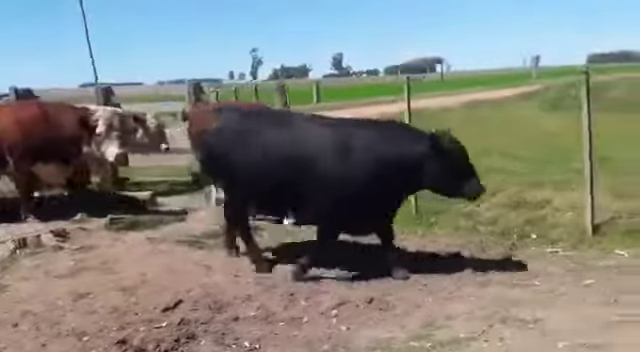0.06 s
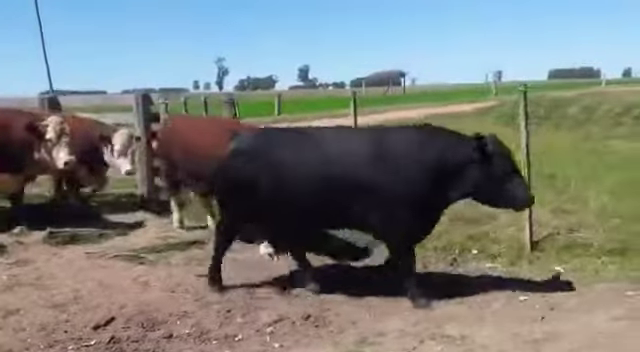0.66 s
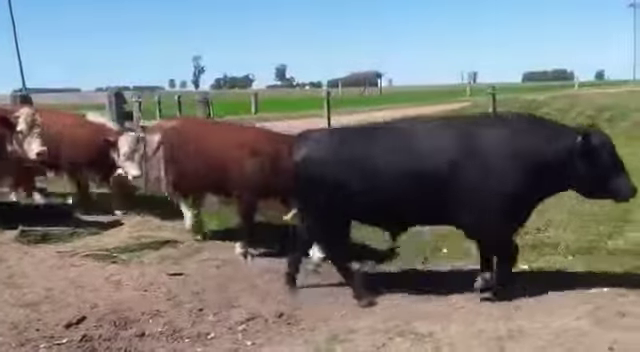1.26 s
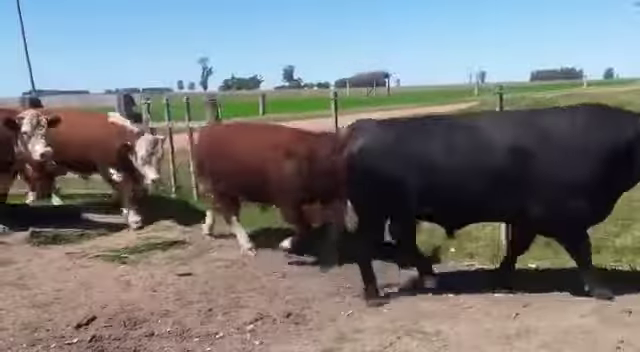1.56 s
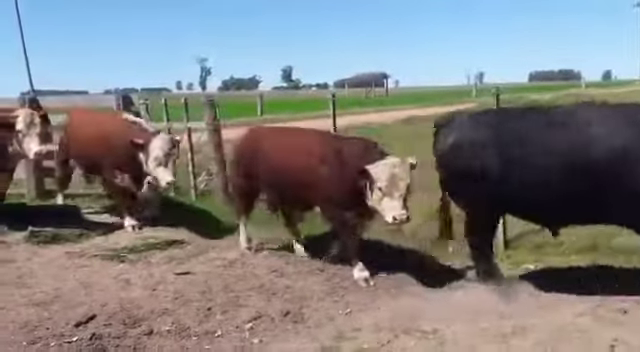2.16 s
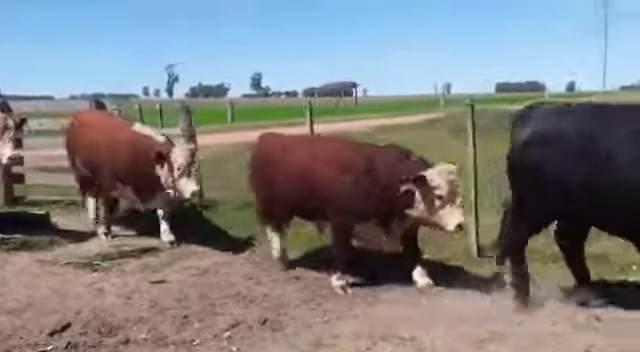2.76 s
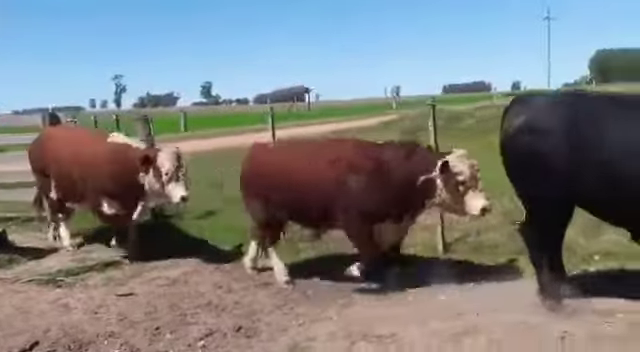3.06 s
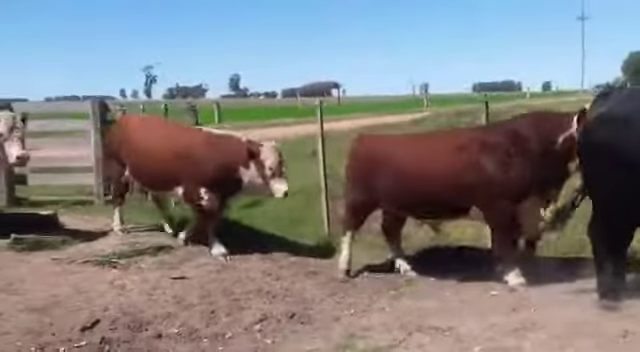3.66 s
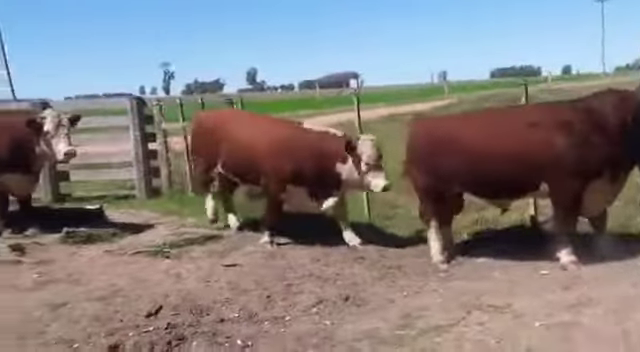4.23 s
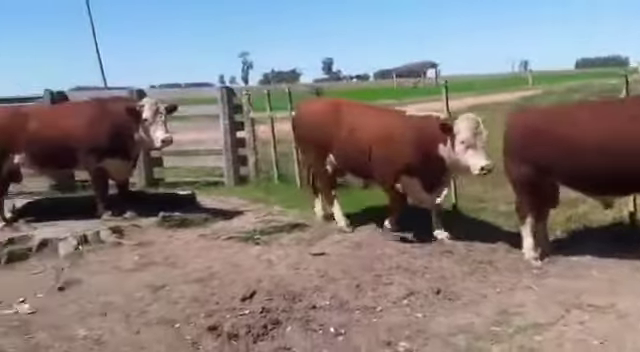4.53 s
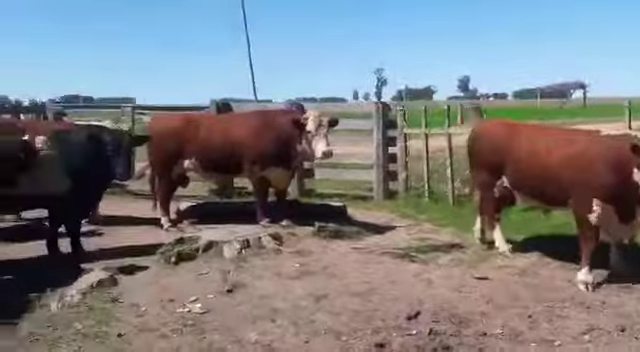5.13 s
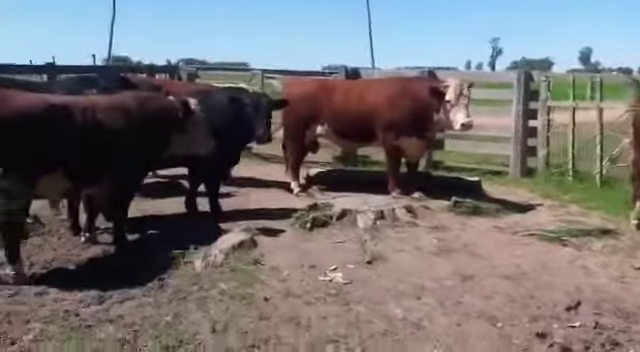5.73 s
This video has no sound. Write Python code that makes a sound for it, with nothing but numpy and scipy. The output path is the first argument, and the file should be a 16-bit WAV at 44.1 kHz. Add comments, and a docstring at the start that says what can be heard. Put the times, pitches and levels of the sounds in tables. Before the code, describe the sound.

Cattle walk over dry ground with soft hoof knocks, then a bull growls and lets out short, high, echoing bellows.

```python
"""A bull bellows while the herd walks across a dry dirt pen in open country.
Each bellow starts as a rough growl, from slack vocal folds slapping together, and breaks into a
high trumpeting note, from tight folds, that echoes off sheds and fences. Hooves knock on the ground,
flick pebbles and scuff up sand. Small birds whistle far off and a light breeze blows."""
import sys
import numpy as np
from scipy import signal
from scipy.fft import rfft, irfft, next_fast_len
from scipy.io import wavfile
from scipy.ndimage import uniform_filter1d, map_coordinates

SR = 44100
rng = np.random.default_rng(int(sys.argv[2]) if len(sys.argv) > 2 else 0)


def log_audio(samples):
    """Write samples as a 16-bit WAV file to the path given in sys.argv[1]."""
    # one column per channel
    frames = np.atleast_2d(samples).T
    # limit to full scale, then quantise
    limited = np.clip(frames, -1, 1)
    pcm = np.round(limited * 32767).astype(np.int16)
    wavfile.write(sys.argv[1], SR, pcm)


N = 259749
TIME = np.arange(N) / SR


def growl(slack_hz=98, tense_hz=108, jitter=.06, throat_lift=1.106):
    """Slack vocal folds slap unevenly and ring the airway; effort makes them faster and steadier."""
    # where the relaxed throat rings: f/Hz, width/Hz, gain/dB
    throat_modes = [(356, 110, -27.5), (408, 160, 10.5), (578, 42, 3.5)]
    # where the open mouth rings: f/Hz, width/Hz, gain/dB
    mouth_modes = [(897, 100, 17), (1130, 120, 8.5), (1680, 720, -28), (3170, 670, -15)]
    throat_gain, chest_gain, mouth_gain = growl_gains() * from_db([[-1.5], [-2.5], [-0.7]])
    effort = np.clip(throat_gain / from_db(-30), 0, 1)
    looseness = 1 - .5 * effort
    pitch = (slack_hz + (tense_hz - slack_hz) * effort) * (1 + jitter * looseness * drift(90))
    cycles = np.cumsum(pitch) / SR
    slaps = rms_one(np.diff(np.floor(cycles), prepend=0))
    # air rushes through once a cycle, while the folds are apart
    puffs = rms_one(rng.standard_normal(N) * np.exp(-(cycles % 1)))
    source = slaps + 1.2 * looseness * puffs
    chest = band(source, 131, 256.6, order=4)
    tense_modes = [(hz * throat_lift, width, db) for hz, width, db in throat_modes]
    throat = (1 - effort) * airway(source, throat_modes) + effort * airway(source, tense_modes)
    mouth = airway(source + puffs, mouth_modes)
    return chest_gain * even_out(chest) + throat_gain * even_out(throat) + mouth_gain * even_out(mouth)


def growl_gains(swell_db=15.5, rounding_s=.02, chest_share=0.54, stop_db_per_s=444.5):
    """Throat, chest and mouth swell and fade together with each push of air."""
    # pushes of air: peak t/s, rise/s, fall/s, then levels before trim: throat/dB, chest/dB, mouth/dB
    pushes = [(2.33, 0.15, .06, -45, -50, -63), (2.473, 0.097, .12, -30, -40.5, -62.5),
              (2.698, .1, .15, -29, -44, -49.5), (2.839, 0.07, 0.064, -41, -41, -55),
              (3.158, 0.031, .26, -40, -51, -55.5), (3.39, 0.23, 0.24, -50, -48, -67),
              (3.689, 0.032, .06, -38, -42, -74), (3.94, 0.15, .07, -27.5, -43, -43),
              (4.272, 0.21, 0.11, -50.5, -50.5, -68), (4.647, 0.041, .17, -33, -45.5, -60),
              (4.92, 0.092, 0.15, -45.5, -45.5, -53.5), (5.136, 0.052, 0.13, -27, -38, -44.5)]
    gains = np.zeros((3, N))
    for s, rise_s, fall_s, throat_db, chest_db, mouth_db in pushes:
        span_s = np.where(TIME < s, rise_s, fall_s)
        drop_db = swell_db * (np.hypot(TIME - s, rounding_s) - rounding_s) / span_s
        # outside the push the folds are quickly still
        stop_db = stop_db_per_s * np.clip(np.abs(TIME - s) - span_s, 0, .5)
        levels_db = np.array([throat_db - drop_db, chest_db - chest_share * drop_db, mouth_db - drop_db])
        gains += from_db(levels_db - stop_db)
    return gains


def airway(source, modes):
    """The air in the throat or mouth rings at several pitches at once."""
    return sum(from_db(db) * resonate(resonate(source, hz, width), hz, width) for hz, width, db in modes)


def trumpet(note, jitter=0.036, flutter=0.84, rasp=0.59, closed_db=-15, wide_open_hz=600):
    """Tight folds sing one high arching note, which a slower flutter tears up as it falls."""
    # overtone strength with the mouth wide open: f/Hz, gain/dB
    overtones = [(700, -13), (870, -18), (1100, -2), (1300, -11), (1480, -8), (1690, -6), (1900, -24),
                 (2250, -18.5), (2600, -37), (3150, -29), (3800, -49), (6000, -70)]
    pitch, level_db, overtones_db, rough = note_shape(*note)
    on = level_db > -70
    count = on.sum()
    phase = 2 * np.pi * np.cumsum(pitch * (1 + jitter * (rough + 0.096) * drift(350))) / SR
    slow_folds = np.sin(2 * np.pi * np.cumsum(100 * (1 + 0.1692 * drift(70))) / SR)
    # the mouth opens as the pitch climbs and lets out the high overtones
    opening = from_db(closed_db * np.clip((wide_open_hz - pitch) / 190, 0, 1))
    tone = np.zeros(N)
    for k in range(1, 9):
        # uneven closing of the folds turns part of each tone hoarse, the higher the more
        hoarse = np.clip(.2 * (k - 1) + .7 * rough[on], 0, .92)
        scatter = (wobble(220, count) + 1j * wobble(220, count)) / np.sqrt(2)
        waver = np.sqrt(1 - hoarse ** 2) + hoarse * scatter
        gain = from_db(overtones_db[on] + at_hz(overtones, k * pitch[on])) if k > 1 else 1.0
        tone[on] += gain * (opening[on] if k > 2 else 1) * np.imag(waver * np.exp(1j * k * phase[on]))
    # rushing air is bright through an open mouth and hollow through a nearly closed one
    bright = rms_one(colour(band(rng.standard_normal(N), 680, 7000, order=3), overtones))
    hollow = rms_one(band(rng.standard_normal(N), 733, 1100))
    hiss = (opening * bright + 0.88 * (1 - 0.74 * opening) * hollow) * (1 + 0.094 * np.sin(phase))
    rumble = rms_one(band(rng.standard_normal(N), 220, 850, order=4))
    breath = rasp * (rough + 0.39) * from_db(overtones_db) * hiss + 0.067 * (rough + 0.2) * rumble
    voice = np.sqrt(2) * tone * (1 + flutter * rough * slow_folds)
    return from_db(level_db) * on * (voice + breath)


def note_shape(s, rise_s, hold_s, crest_s, crest_hz, db, sag_db_per_s, overtones_db,
               rough_before, rough_after):
    """Pitch, level, overtones and roughness of a note: it brightens, then tears near its highest pitch."""
    break_hz, arch_fall_s = 420.3, .053   # the pitch arches up from where the voice breaks, and back
    attack_db, release_db_per_s = 16, 478
    bloom_lead_s, bloom_s, pure_db = 0.02, 0.038, -6.5   # overtones start weak and grow
    tear_lead_s, tear_s = 0.019, 0.023
    t = TIME - s
    past_crest = t - crest_s
    arch = np.exp(-(past_crest / np.where(past_crest < 0, rise_s, arch_fall_s)) ** 2)
    pitch = break_hz + (crest_hz - break_hz) * arch
    level_db = (db - attack_db * np.maximum(-t, 0) / rise_s
                - sag_db_per_s * np.clip(t, 0, hold_s)
                - release_db_per_s * np.maximum(t - hold_s, 0))
    bloom = step_up((past_crest + bloom_lead_s) / bloom_s)
    torn = step_up((past_crest + tear_lead_s * rough_after) / tear_s)
    rough = np.clip(rough_before + (rough_after - rough_before) * torn, 0, 1)
    return pitch, level_db, overtones_db + pure_db * (1 - bloom), rough


def hooves(thud_s=0.0035, thud_trim_db=-3, crunch_trim_db=-4, grit_db=-7):
    """A hoof thuds into the soil, its horn knocks and clacks on clods, and grit crunches under it."""
    # firm steps, before trims: t/s, knock/dB, thud/dB above the knock, clack/dB above the knock
    firm_steps = [(.081, -50.5, -2, 4), (0.145, -50.5, -14, -4), (0.194, -59, 10, 12.5),
                  (0.253, -51, -18, 9.5), (0.314, -52, -15, 3), (.459, -44, -5, 3.5), (.503, -48, 4.5, 3.5),
                  (.559, -52, 7, 1), (0.63, -46.5, -5, 7), (.818, -24.5, -8, -19.5),
                  (0.85, -37.5, 3.5, -19), (1.076, -51, 3, 2), (1.129, -48.5, -3.5, -2),
                  (1.222, -54, 9.5, 7), (1.339, -49.5, -14, -8), (1.606, -56, 11, 1),
                  (1.916, -49.5, 1.5, 11), (1.944, -65, 24, 18.5), (1.968, -39.5, -6, -4.5),
                  (2.028, -40, -3.5, -12), (2.301, -42.5, -3, 3), (2.346, -40.5, -1, -5),
                  (3.087, -51, 21.5, -5.5), (3.383, -48, -7, -6.5), (3.487, -46.5, 9, -8),
                  (3.658, -44.5, 4.5, -4)]
    # knock, clack and grit: low/Hz, high/Hz, decay/s
    parts = [(370, 862, 0.012), (1030, 1920, 0.013), (2670, 4200, 0.017)]
    usual_hz, usual_db, hz_per_db = 165, -47.5, 3   # a harder blow stiffens the soil: a higher thud
    t, out = TIME[:SR // 6], np.zeros(N + SR)

    def sized(hit, db):
        """Give a hit the energy of a hundredth of a second of sound at this level."""
        return from_db(db) * hit / np.sqrt(np.sum(hit ** 2) / (SR / 100))

    for s, knock_db, thud_db, clack_db in firm_steps + light_steps():
        thud_hz = usual_hz + hz_per_db * (knock_db - usual_db)
        # the soil gives under the weight and springs back for a cycle or two
        step = sized(np.sin(2 * np.pi * thud_hz * t) * t * np.exp(-t / thud_s), thud_db + thud_trim_db)
        for (low, high, decay_s), share_db in zip(parts, (0, clack_db, clack_db + grit_db)):
            breaks = rng.random(len(t)) < 1800 / SR   # crumbs of soil give way one by one
            crumble = rng.standard_normal(len(t)) * (breaks + 0.1) * np.exp(-t / decay_s)
            crumble[0] += 3.2   # first hard contact
            step += sized(band(crumble, low, high, order=3), share_db + crunch_trim_db)
        out[int(s * SR):int(s * SR) + len(t)] += from_db(knock_db) * step
    return out[:N]


def light_steps(per_s=7, herd_near_s=1.9, base_db=-62, spread_db=2):
    """Other hooves land softly at random while the herd is near; rows are like the firm steps."""
    draws = rng.random((int(per_s * herd_near_s), 4))
    return [((k + when) / per_s, base_db + spread_db * (2 * force - 1),
             spread_db * weight, spread_db * hardness)
            for k, (when, force, weight, hardness) in enumerate(draws)]


def pebbles(trim_db=3):
    """Stones flicked against each other give one dry tick each."""
    # stone hits: t/s, strength/dB before trim and filters
    hits = [(0.775, -37), (4.9662, -45.5), (5.1356, -56.5), (5.391, -41)]
    clicks = np.zeros(N)
    for s, db in hits:
        clicks[int(s * SR)] = from_db(db + trim_db)
    return band(clicks, 1200, 5500) + 7 * resonate(clicks, 3600, 450) + 7 * resonate(clicks, 2000, 470)


def scuff(coarse_trim_db=2, fine_trim_db=1, kick_rise_s=0.03, clods_over_sand_db=8.5):
    """Coarse noise and fine sand: dirt underfoot and, near the end, the lingering wash of the bellows."""
    # coarse mid-range noise and fine sand, before trims: t/s, coarse/dB, fine/dB
    levels = [(0, -67.5, -82), (.8, -57.5, -71.5), (1.0, -63.5, -72), (1.72, -65.5, -76), (1.8, -58.5, -73),
              (2.15, -58.5, -70.5), (2.65, -51, -61), (3.0, -56, -64), (3.6, -58.5, -70), (4.3, -61, -78),
              (4.5, -78, -85), (4.75, -61.5, -85), (5.0, -54, -72.5), (5.4, -54, -71), (5.89, -65.5, -79.5)]
    # sand thrown by dragging hooves: t/s, length/s, level/dB
    kicks = [(0.183, .11, -61), (.83, 0.095, -61), (1.755, 0.38, -61.5), (2.823, 0.12, -54)]
    # tone of the coarse noise and of the sand: f/Hz, gain/dB
    coarse_tone = [(150, 5.0), (500, 7.5), (1000, 7.5), (1700, 7.5), (2600, 1.5), (4000, -5),
                   (5500, -21.5), (8000, -34.5)]
    sand_tone = [(2000, 4.5), (4500, 8.5), (6000, 3.5), (7500, -2.5), (9500, -3.5), (12000, -4.5)]
    coarse_db, fine_db = in_time(levels)
    thrown = sum(from_db(db) * np.interp(TIME - s, [0, kick_rise_s, length], [0, 1, 0])
                 for s, length, db in kicks)
    bursts = from_db(2.3 * drift(38))   # coarse and fine flicker together
    coarse_gain = from_db(coarse_db + coarse_trim_db) + from_db(clods_over_sand_db) * thrown
    sand_gain = from_db(fine_db + fine_trim_db) + thrown
    coarse = colour(grains(per_s=1600, spread_db=-5.5), coarse_tone)
    sand = colour(grains(per_s=3700, spread_db=2), sand_tone)
    return bursts * (coarse_gain * rms_one(coarse) + sand_gain * rms_one(sand))


def birds(unsteady=.045):
    """A small bird sings two chirps and a held whistle, its pitch a little unsteady."""
    # the three notes: delay/s, length/s, start/Hz, middle/Hz, end/Hz
    phrase = [(0, 0.05, 4080, 4295, 3270), (0.05, 0.071, 2730, 3630, 3124),
              (0.105, 0.179, 3710, 3580, 3610)]
    # each time it sings: t/s, first note/dB, second note/dB, third note/dB
    songs = [(0.257, -68, -75, -92), (.67, -65, -85, -73), (1.125, -57.5, -54, -65.5),
             (3.999, -58.5, -51.5, -77), (5.627, -80, -64, -89)]
    out, waver = np.zeros(N), 1 + unsteady * drift(700)
    for s, *notes_db in songs:
        for (delay, length, *pitches_hz), db in zip(phrase, notes_db):
            progress = np.clip((TIME - s - delay) / length, 0, 1)
            pitch = np.interp(progress, [0, .5, 1], pitches_hz) * waver
            swell = np.sqrt(np.abs(np.sin(np.pi * progress)))
            out += from_db(db) * swell * np.sin(2 * np.pi * np.cumsum(pitch) / SR)
    return out


def yard_echo(x, fade_60_db_s=1.38, build_s=0.041, tail_db=-16):
    """Sound slaps back from a few walls, then a thin scattered tail comes from far away."""
    # slaps from sheds and fences: delay/s, gain/dB
    slaps = [(.068, -14.5), (.112, -19.5), (.163, -34), (.215, -33)]
    # tone of the whole echo: f/Hz, gain/dB
    echo_tone = [(100, 15.5), (400, -6.5), (620, -2), (850, -1.5), (1110, 7), (1400, -1), (1750, 6.5),
                 (3300, -3.5), (6000, -2), (12000, -7)]
    # how much sound is aimed at the walls as the bull turns: t/s, gain/dB
    facing = [(1.2, 3.5), (2.6, -5), (3.9, -7), (4.8, -2), (5.3, -5), (5.38, 2.5)]
    t = TIME[:2 * SR]
    fade = from_db(-60 * t / fade_60_db_s) * (1 - np.exp(-t / build_s))
    response = from_db(tail_db) * rms_one(rng.standard_normal(len(t)) * fade) / np.sqrt(len(t))
    for delay, db in slaps:
        response[int(delay * SR)] += from_db(db)
    facing_db, = in_time(facing)
    return signal.fftconvolve(x * from_db(facing_db), colour(response, echo_tone))[:N]


def breeze(air_db=-62):
    """Open air hisses steadily; a low, lumpy rumble swells and fades as the herd moves."""
    # tone of the breeze and far country: f/Hz, gain/dB
    air_tone = [(20, -9.5), (50, -2), (125, 7.5), (250, 8), (500, -5), (1000, -2.5), (1600, -9),
                (2500, -16), (3700, -13), (6800, -45.5), (10800, -32), (12000, -35.5)]
    # the low rumble: t/s, average level/dB
    rumble_levels = [(0, -72), (1.5, -80), (1.68, -58.5), (2.9, -55), (3.6, -60.5), (4.25, -53),
                     (4.45, -83), (4.8, -57.5), (5.3, -67), (5.89, -61.5)]
    rumble_db, = in_time(rumble_levels)
    air = from_db(air_db) * rms_one(colour(rng.standard_normal(N), air_tone))
    rumble = from_db(rumble_db + 2 * drift(11)) * rms_one(band(rng.standard_normal(N), 94, 190))
    return air + rumble


def from_db(db):
    """Turn decibels into a gain to multiply by."""
    return 10 ** (np.asarray(db) / 20)


def rms_one(x):
    """Scale a signal to an average power of 1."""
    return x / np.sqrt(np.mean(x ** 2) + 1e-20)


def even_out(x):
    """Even out loudness over a few voice cycles."""
    return x / np.sqrt(np.abs(uniform_filter1d(x * x, size=1300)) + 1e-12)


def in_time(rows):
    """Join timed rows with straight lines, one curve for each column of values."""
    s, *columns = np.transpose(rows)
    return [np.interp(TIME, s, c) for c in columns]


def step_up(x):
    """A smooth step from 0 to 1 around x = 0."""
    return .5 + .5 * np.tanh(x)


def band(x, low_hz, high_hz, order=2):
    """Keep the sound between two frequencies."""
    sections = signal.butter(order, [low_hz, min(high_hz, .45 * SR)], "band", fs=SR, output="sos")
    return signal.sosfilt(sections, x + 1e-18)


def resonate(x, hz, width_hz):
    """Ring at one frequency, with a gain of 1 there."""
    r = np.exp(-np.pi * width_hz / SR)
    feedback = [1, -2 * r * np.cos(2 * np.pi * hz / SR), r * r]
    return signal.lfilter(np.array([1, 0, -1]) * (1 - r * r) / 2, feedback, x + 1e-18)


def at_hz(points, hz):
    """Read a tone curve's decibels at any frequency, with octaves evenly spaced."""
    points_hz, points_db = np.transpose(points)
    return np.interp(np.log(hz + 1), np.log(points_hz), points_db)


def colour(x, points):
    """Turn a signal's frequencies up or down along a tone curve."""
    size = next_fast_len(len(x))
    gains = from_db(at_hz(points, np.fft.rfftfreq(size, 1 / SR)))
    return irfft(rfft(x, size) * gains, size)[:len(x)]


def drift(rate):
    """A smooth random curve of typical size 1, changing about `rate` times a second."""
    knots = rng.standard_normal(8192)
    return rms_one(map_coordinates(knots, [TIME * rate], order=2, mode="wrap"))


def wobble(rate, count):
    """A short random curve like drift, `count` samples long."""
    knots = rng.standard_normal(1024)
    return map_coordinates(knots, [np.arange(count) * rate / SR], order=2, mode="wrap")


def grains(per_s, spread_db):
    """Random clicks of uneven size."""
    sizes = from_db(spread_db * np.minimum(rng.exponential(1, N), 4)) * rng.choice([-1, 1], N)
    return rms_one(sizes * (rng.random(N) < per_s / SR))


def scene():
    """The bull and the far birds echo across the yard; the near hooves echo much less."""
    # trumpeting notes: full voice t/s, rise/s, hold/s, delay to top pitch/s, top pitch/Hz, level/dB,
    # sag/(dB per s), overtones/dB, roughness before and after the voice tears (0 to 1)
    notes = [(2.596, .075, 0.094, 0.024, 553, -18, 102, -3.5, 0.087, 0.37),
             (3.857, 0.026, 0.11, .089, 504, -33.5, -52, -8, .52, 0.69),
             (4.752, .05, 0.082, .038, 650, -18, 25.5, -3, 0.051, 0.44),
             (5.314, .05, 0.093, .043, 595.7, -16.5, 132.5, -0.5, 0.094, 0.78)]
    bellows = growl() + sum(trumpet(note) for note in notes)
    steps, song = hooves() + pebbles(), birds()
    echo = yard_echo(bellows + from_db(-16.5) * steps + from_db(5.5) * song)
    return (bellows + song + steps + echo + scuff() + breeze())[None]


def record(dry, bass_hz=45, notch_hz=8050, top_hz=12050):
    """The microphone thins the deep bass and its opening makes a dip in the treble; the top is cut."""
    thinned = signal.sosfilt(signal.butter(1, bass_hz, "high", fs=SR, output="sos"), dry)
    notched = signal.lfilter(*signal.iirnotch(notch_hz, 3.6, fs=SR), thinned)
    return signal.sosfilt(signal.ellip(10, .3, 80, top_hz, fs=SR, output="sos"), notched)


dry = scene()
out = record(dry)
log_audio(out)
```